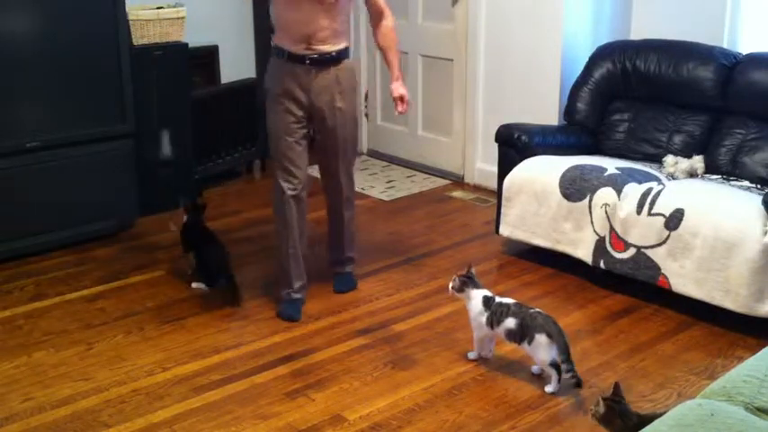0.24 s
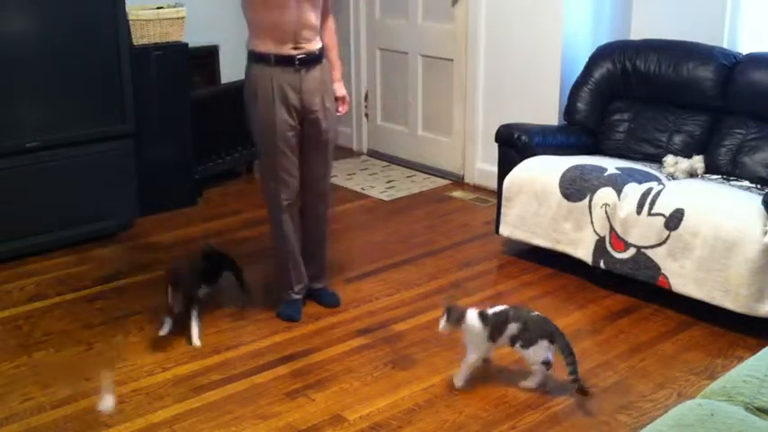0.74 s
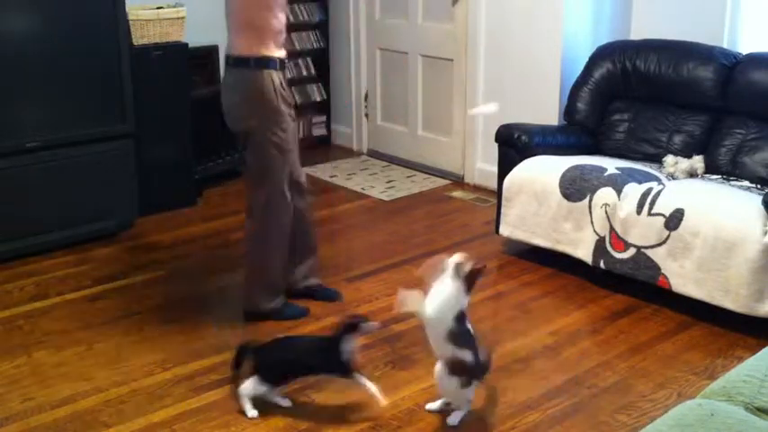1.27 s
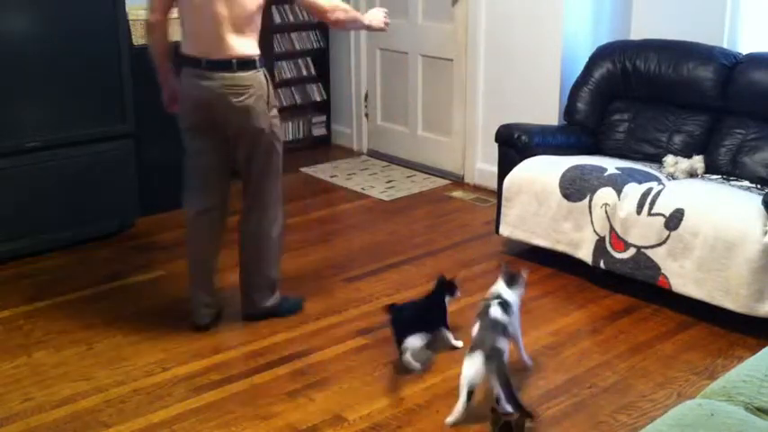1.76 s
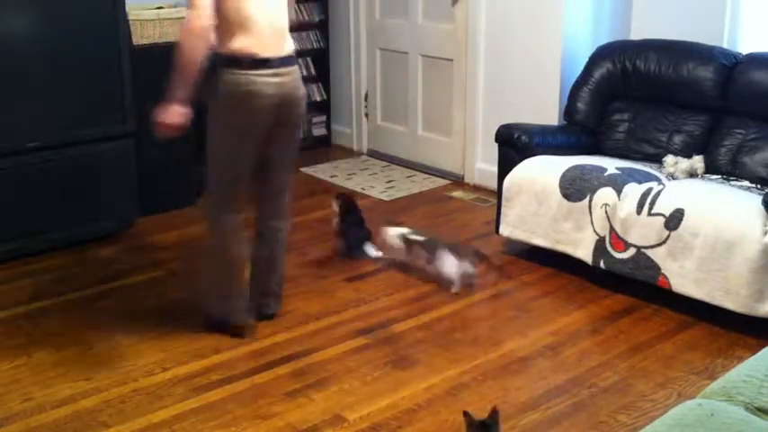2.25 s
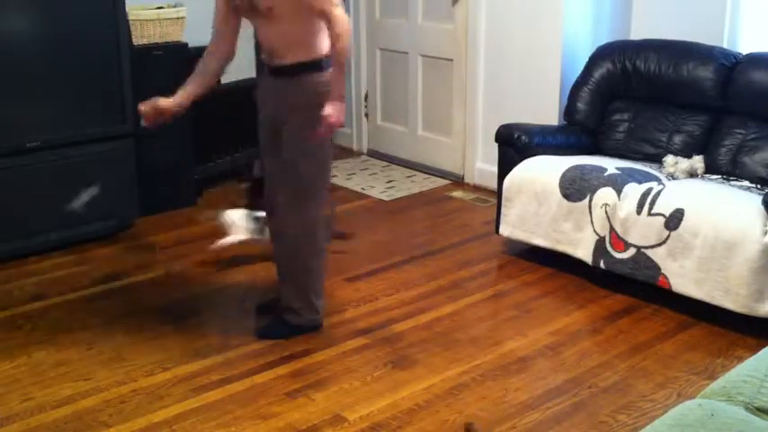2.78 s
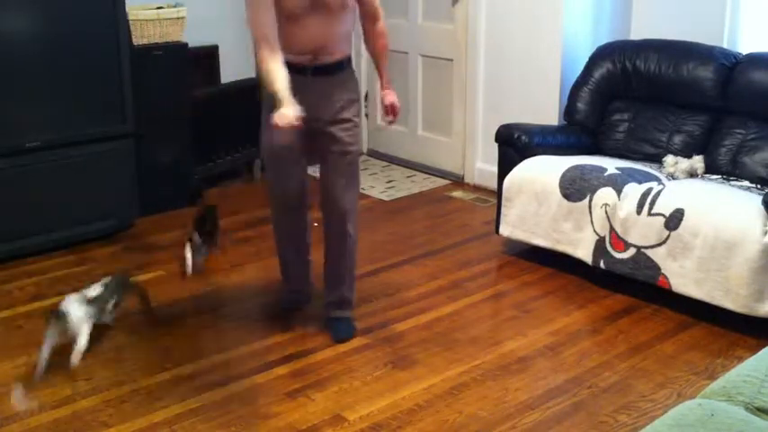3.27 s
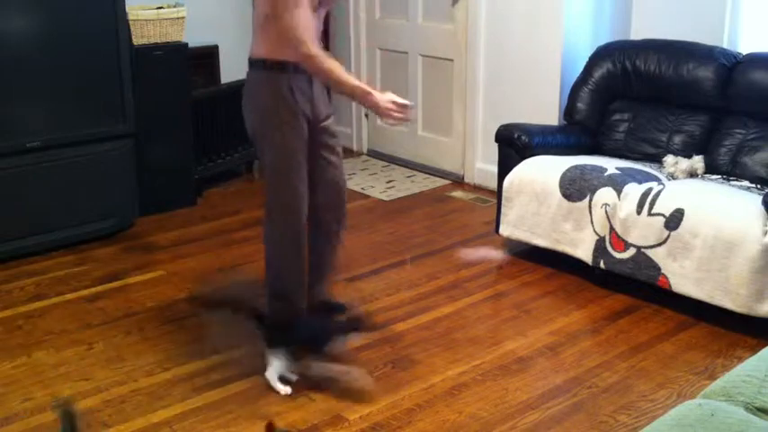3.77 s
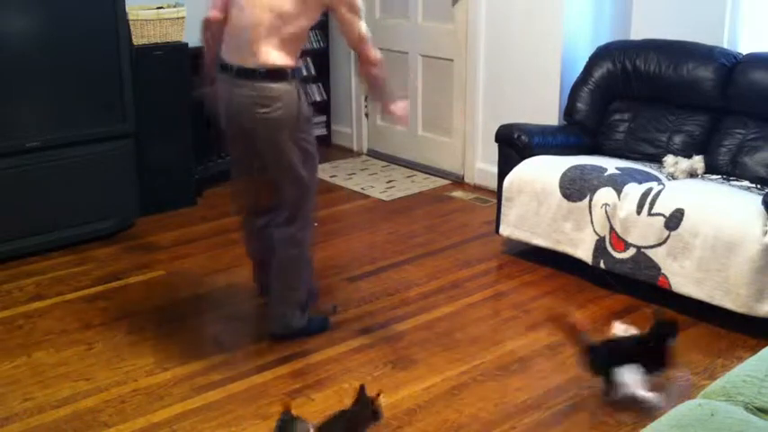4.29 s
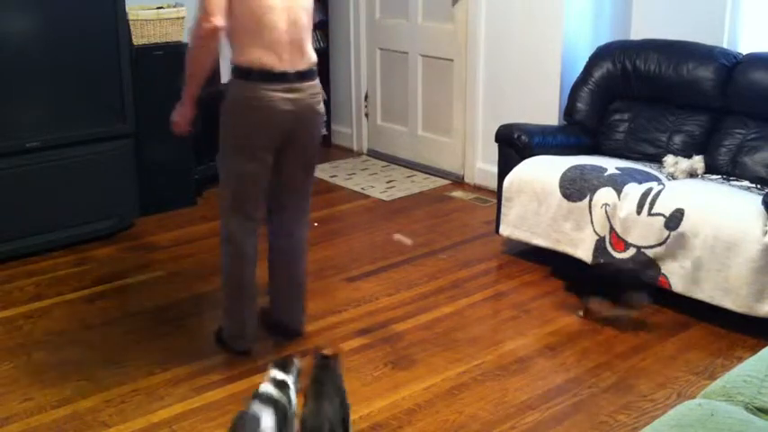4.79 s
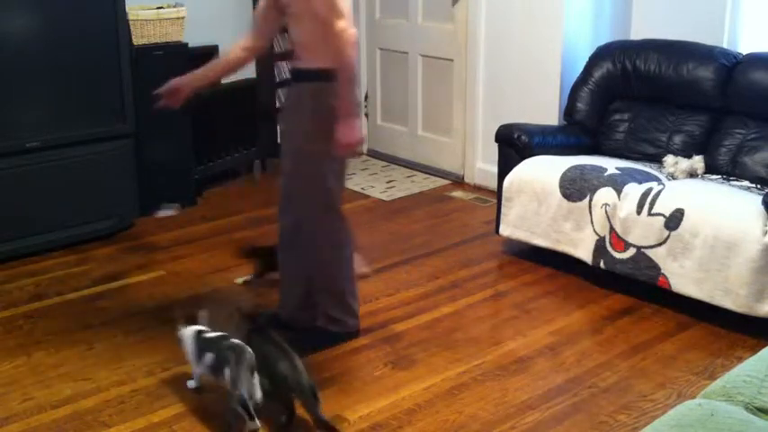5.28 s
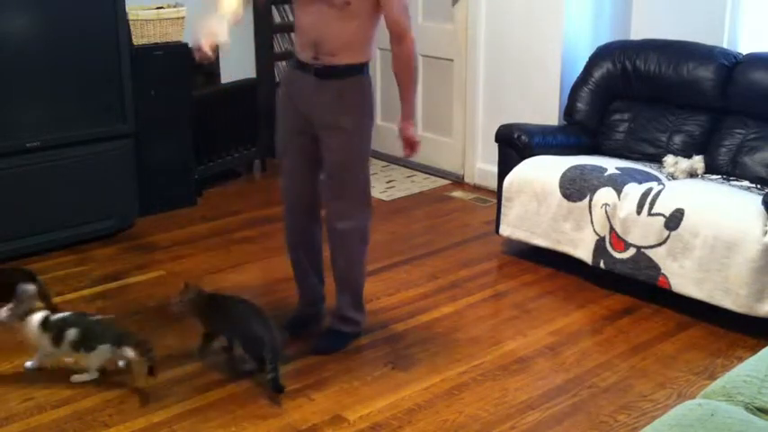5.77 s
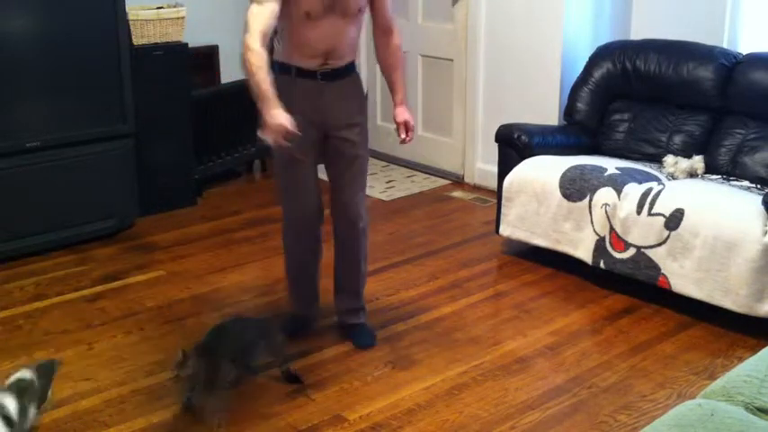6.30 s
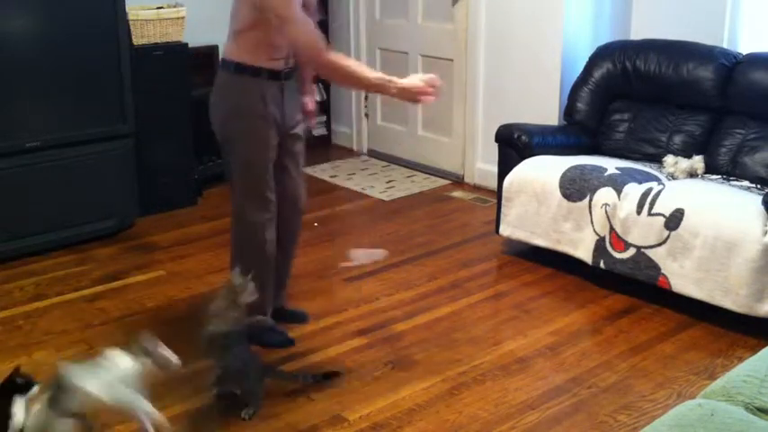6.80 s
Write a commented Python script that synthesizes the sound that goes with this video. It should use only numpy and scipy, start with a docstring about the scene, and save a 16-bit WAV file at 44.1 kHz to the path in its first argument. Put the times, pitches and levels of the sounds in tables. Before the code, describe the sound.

Indoors on hardwood, a light rattling toy knocks the boards in dry, irregular clicks while claws skid and padded paws land with dull thumps. The opening is sparse, with louder double clacks near the middle and the busiest, hardest hits towards the end. Soft gritty rubbing swells and fades. Short room echo, quiet air, one slightly dull small microphone.

```python
"""Cats chasing a toy on bare boards

In a living room cats chase a small hard toy swung on a string over a bare wooden floor.
Toy and claws tap and skid: gritty noise bursts through resonances of board, shell and rattle.
Paws land with soft thumps from low resonances; fur and socks scuff as lumpy, grainy noise.
The room answers every contact with a decaying noise tail; a faint hush of air lies underneath."""
import sys
import numpy as np
from scipy import signal
from scipy.fft import rfft, irfft, next_fast_len
from scipy.io import wavfile
from scipy.ndimage import map_coordinates

SR = 44100
rng = np.random.default_rng(int(sys.argv[2]) if len(sys.argv) > 2 else 0)


def unload_wav(signal):
    """Save mono or channel-first audio to the path in sys.argv[1] as 16-bit WAV at rate SR, clipped to [-1, 1]."""
    wavfile.write(
        sys.argv[1],
        SR,
        np.round(np.clip(np.atleast_2d(signal).T, -1, 1) * 32767).astype(np.int16),
    )


N = 310905  # samples in the scene
LIFE = 2 ** 15  # samples kept for one contact and its room answer

# Response of the small microphone. Each row: frequency in Hz, gain in dB.
MIC = [(30, -17), (120, -7), (300, -3.5), (750, -4.5), (1000, -4), (2500, -4.5), (3200, -12.5),
       (4100, -7.5), (5200, -8.5), (5800, -5.5), (8000, -9), (11000, -5.5), (15000, -11.5)]


def taps():
    """Each tap rings the board, the toy's shell and rattle, cracks in the treble and gives a faint low push."""
    # Hits of toy and claws. Each row: start in seconds, nominal peak in dB ahead of the microphone,
    # board level in dB, pitch of the toy's ring in Hz, shell level in dB, rattle pitch in Hz,
    # rattle level in dB, crack level in dB, skid decay time in seconds, room over direct sound in dB.
    # Board, shell, rattle and crack levels are relative to the ring.
    tap_rows = [(0.026, -43, -10, 2040, -8, 4470, -13, -17, 0.0032, 14),
                (0.056, -37.5, -16, 2180, -12, 4340, 9, -4, 0.0025, 9),
                (0.074, -30, 11.5, 2140, 7, 4280, 25, 6.5, 0.003, 3.5),
                (0.356, -45.5, 4, 1990, -10, 4130, 6, -29, 0.0022, 3),
                (0.387, -27, -16, 1910, -9, 4600, 1, -8.5, 0.0028, 9.5),
                (0.557, -42, -5, 1690, -10, 4200, 12, -8, 0.0025, 10),
                (0.894, -18, -46, 1900, -24, 4820, -11, -19, 0.0023, 3.5),
                (1.033, -31, -1, 2070, 0, 4260, 18, -4, 0.0025, 11),
                (1.062, -37.5, 3, 2190, 0, 4200, 6, -4, 0.0022, 3),
                (1.13, -33, -15, 2370, -7.5, 4450, -8, -10, 0.0021, 7),
                (1.147, -44, -15, 2120, -17, 3970, -3, -15, 0.0025, 7),
                (1.283, -43, -14, 1300, -8, 3760, 10, 1, 0.0033, 11),
                (1.342, -41, 2.5, 2530, 1.5, 4320, -1, -0.5, 0.007, 13),
                (1.773, -37.5, -10, 2310, -13, 3890, -22, -22, 0.0025, 4),
                (1.795, -30, -12.5, 1630, -26, 4550, -6, -13.5, 0.0053, 3),
                (2.023, -15, 0.5, 1460, -11.5, 4000, -5.5, -13, 0.0021, 13.5),
                (2.06, -31.5, 12, 1380, -18, 4700, 10, -9, 0.0023, 9),
                (2.308, -36.5, -18, 2130, -3, 4230, -6, -15, 0.0018, 3),
                (2.344, -24.5, -24, 1350, -4.5, 4200, -6, -10.5, 0.0075, 10),
                (2.452, -30, -2, 1980, -7, 4130, -7, -22, 0.0025, 9),
                (2.518, -30, -25, 1930, -4, 4070, 5, -5.5, 0.0031, 15),
                (2.542, -24, -16, 2150, -15, 4850, -6.5, -13.5, 0.0057, 18),
                (2.827, -32.5, -19, 1460, 7, 4620, 13, -16, 0.0013, 1.5),
                (3.094, -15, -3, 1640, -11, 4000, -8, -4, 0.0013, 9),
                (3.099, -12, -3, 1780, -3.5, 4130, -8, -5.5, 0.0012, 2),
                (3.328, -28, 8, 2400, -17, 4600, -3, 14, 0.0032, 9),
                (3.365, -31.5, 11, 1310, -8, 3780, 3, 0, 0.0069, 17),
                (3.493, -18.5, -5.5, 1730, -21, 3740, -11, -12, 0.00083, 7.5),
                (3.598, -18.5, -15, 2120, -4, 4330, -11, -20, 0.0015, 2),
                (3.743, -23.5, 8, 1250, -21, 5240, -24, 21, 0.0025, 0),
                (3.782, -28.5, 14, 1610, -15, 4370, -16, 8.5, 0.0038, 7),
                (3.913, -32.5, 16.5, 1860, 0, 5400, 12, 9.5, 0.0022, 14),
                (4.029, -39, -7, 1360, -17, 4040, -6, -10, 0.0025, 5),
                (4.202, -34.5, 6, 2210, -14, 5080, -3, 1, 0.0075, 10),
                (4.241, -25, -11.5, 2270, -10, 4000, -1.5, -12, 0.0051, 8),
                (4.267, -25.5, -13, 2190, -17, 4680, -3.5, -16, 0.0054, 7),
                (4.304, -28, -4, 1840, -10, 4200, 9, -4.5, 0.0075, 13),
                (4.466, -15.5, 1.5, 1450, -9.5, 4720, -4.5, -13.5, 0.0015, 12),
                (4.479, -24.5, -17, 1460, -8, 4170, -13, -1, 0.0025, 3.5),
                (4.614, -27, 3.5, 1210, -4, 4280, 1, -5.5, 0.0064, 9),
                (4.709, -33.5, -2, 2160, 0, 4060, 2, -3, 0.0023, 7),
                (4.791, -35, 9.5, 1290, -8, 4280, -1, -5, 0.0035, 17),
                (4.873, -22.5, -15.5, 2320, -13.5, 4900, -19, -20.5, 0.0048, 8.5),
                (5.106, -34, -1, 1740, -4, 4930, -32, -5.5, 0.0031, 17),
                (5.131, -34, 0, 1770, -12, 4390, -19, -8, 0.0025, 3),
                (5.162, -31, -5.5, 1580, -23, 4700, -19, -16.5, 0.0042, 13),
                (5.224, -32, -7, 1590, -19, 4670, -7, -17, 0.0029, 17),
                (5.245, -25.5, 0, 1720, -15, 4600, 8, -6, 0.0047, 18),
                (5.591, -26.5, -5, 2420, -13, 4040, -13, -15, 0.0067, 6.5),
                (5.621, -14, 1, 2450, -11, 4430, 16, -3.5, 0.0025, 5.5),
                (5.627, -18, -3, 2230, -13, 4160, 34, -4, 0.0021, 7),
                (5.65, -14, -18, 1860, 4.5, 4640, 8, 2.5, 0.0016, 20),
                (5.669, -18, -3, 1860, -2, 4150, -9, -14, 0.0019, 0.5),
                (5.937, -36.5, 1, 2080, -6, 5000, -15, 1.5, 0.0029, 10),
                (6.017, -37, -2, 2280, -19, 5040, -19, -12, 0.0033, 6),
                (6.063, -32, -6, 1390, -24, 4120, -23, -1, 0.0021, 14),
                (6.163, -31, -26, 2050, -7, 5160, -35, -11.5, 0.0019, 5.5),
                (6.244, -14.5, 3.5, 2140, -4.5, 4060, 7, -2, 0.0039, 8.5),
                (6.277, -17, 8.5, 2080, -6, 4900, 14, -8, 0.0018, 6),
                (6.52, -30.5, 0, 2060, -7.5, 4450, 0, -6.5, 0.0044, 12),
                (6.581, -41, 6, 2020, -16, 4570, -6, 13, 0.0025, 5),
                (6.707, -13.5, 8.5, 1420, 6.5, 4420, -4, -7, 0.00092, 3)]
    # Weaker rings of the toy's shell. Each row: pitch in Hz, width in Hz, level in dB added to the tap's shell level.
    shell_rings = [(1566, 167, -12), (1897, 1800, 4.5), (2790, 2100, -14.5)]
    columns = np.array(tap_rows).T[:, :, None]
    s, db, board_db, ring_hz, shell_db, rattle_hz, rattle_db, crack_db, skid, room_db = columns
    f = np.fft.rfftfreq(LIFE, 1 / SR)

    board = amp(board_db) * mode(f, hz=1058, width_hz=566) ** 2
    # a hit that wakes more shell rings broader: 0.14 dB of width per dB of shell
    width_over_pitch = np.clip(0.4 * amp(0.14 * shell_db), 0.1, 1)
    ring = mode(f, ring_hz, width_over_pitch * ring_hz) ** 2
    shell = sum(amp(shell_db + level) * mode(f, hz, width) ** 2 for hz, width, level in shell_rings)
    # a freer, louder rattle rings purer: 0.19 dB of width lost per dB of level
    rattle_width_hz = 1190 * amp(-0.19 * rattle_db)
    rattle = amp(rattle_db) * mode(f, rattle_hz, rattle_width_hz) ** 2
    crack = amp(crack_db) * mode(f, hz=6350, width_hz=24200) ** 2

    body = board - ring - shell + rattle + crack
    floor = spots(count=len(s), spread=0.006, depth=0.44)
    sound = body * floor * contacts(skid, wet_db=room_db, build=0.00061, grit_db=-3.0)
    # the joists give once with the board, without echo
    push = amp(-4.5 + 0.27 * board_db) * mode(f, hz=24, width_hz=63)
    return played(s[:, 0], db[:, 0], sound + push, crest_db=8.5)


def paws():
    """A padded paw pushes the boards softly: a boom that depends on the spot and a duller thud above it."""
    # Landings. Each row: start in seconds, nominal peak in dB ahead of the microphone, boom pitch in Hz,
    # thud level in dB relative to the boom, contact decay time in seconds, room over direct sound in dB.
    landings = [(0.12, -56.5, 370, -15, 0.0072, 4), (0.239, -58, 400, -10, 0.006, 1),
                (0.689, -55, 354, -22, 0.0047, 5), (0.889, -45, 257, -17, 0.006, 0),
                (0.91, -36, 229, -22, 0.0067, 5), (1.145, -39.5, 186, -9, 0.0091, 6),
                (1.462, -42.5, 240, -16, 0.0067, 3), (1.647, -55, 214, -20, 0.006, 3),
                (1.918, -46, 197, -17, 0.0075, 4), (2.023, -39.5, 315, -14, 0.0051, 0),
                (2.076, -33.5, 272, -22, 0.003, 12), (2.309, -40, 344, -7, 0.0079, 0),
                (2.343, -31.5, 200, 5, 0.006, 9), (2.453, -45, 172, 2, 0.0055, 6),
                (2.809, -34.5, 334, -23, 0.005, 1.5), (2.83, -32, 213, -22, 0.0045, -3.5),
                (3.096, -42, 306, -8, 0.006, 5), (3.232, -32.5, 272, -29, 0.0053, -2.5),
                (3.326, -34.5, 244, -14, 0.006, -0.5), (3.474, -40, 226, -6, 0.006, 1),
                (3.646, -30.5, 220, -2, 0.006, 1), (3.742, -34, 210, -9, 0.011, 8),
                (4.024, -35.5, 244, -22, 0.0056, -1.5), (4.292, -35.5, 247, -14, 0.0046, 1),
                (4.386, -45, 210, -13, 0.006, -1), (4.474, -33.5, 331, 8, 0.0054, 9),
                (4.492, -33.5, 268, -2, 0.006, -8), (4.68, -40.5, 249, -16, 0.006, 3),
                (4.952, -45.5, 180, -28, 0.015, 9), (5.146, -51.5, 410, -13, 0.0065, 3),
                (5.348, -42.5, 205, -22, 0.006, 3), (5.552, -34.5, 242, -28, 0.0049, 1),
                (5.658, -37, 304, -19, 0.0052, -3), (5.708, -26.5, 320, -26, 0.0037, 2.5),
                (5.907, -34, 272, -5, 0.0068, 4.5), (6.202, -49, 210, -8, 0.006, 1),
                (6.249, -31, 392, -11, 0.0071, 6.5), (6.416, -36.5, 310, -13, 0.0079, 3),
                (6.543, -36.5, 244, -14, 0.0054, -1), (6.602, -33.5, 347, -28, 0.006, 2),
                (6.702, -37.5, 392, 1, 0.0075, 3), (6.976, -33, 174, -28, 0.0068, 7)]
    s, db, boom_hz, thud_db, contact, room_db = np.array(landings).T[:, :, None]
    f = np.fft.rfftfreq(LIFE, 1 / SR)
    boom = mode(f, boom_hz, width_hz=0.42 * boom_hz) ** 2
    thud = amp(thud_db) * mode(f, hz=547, width_hz=126) ** 2
    boards = amp(-4.5) * mode(f, hz=229, width_hz=196) ** 2
    body = boom - thud + boards
    floor = spots(count=len(s), spread=0.0056, depth=0.77)
    sound = body * floor * contacts(contact, wet_db=room_db, build=0.0015, grit_db=1.5)
    return played(s[:, 0], db[:, 0], sound, crest_db=5.5)


def scuff():
    """Soft gritty rubbing of fur and socks on the boards, which comes in lumps and rings on in the room."""
    # Rubbing over time. Each row: time in seconds, level in dB ahead of lumps, room and microphone.
    rub_levels = [(0.0, -61), (0.14, -49), (0.39, -66), (0.7, -61.5), (0.94, -75), (1.06, -53),
                  (1.55, -63.5), (1.77, -60.5), (2.26, -49.5), (2.51, -44.5), (2.61, -50), (2.75, -47.5),
                  (2.9, -57.5), (3.14, -68), (3.26, -53.5), (3.65, -42.5), (4.02, -50), (4.26, -53.5),
                  (4.46, -41), (5.2, -57), (5.38, -62.5), (5.61, -56.5), (5.77, -39), (6.05, -56.5),
                  (6.42, -50.5), (7.05, -56)]
    # Colour of fur and socks on wood. Each row: frequency in Hz, relative spectral level in dB per Hz.
    fur_colour = [(150, -7), (400, 2), (750, -3), (1500, -6), (3000, -3), (4500, -0.5), (8000, -10),
                  (12000, -19), (16000, -9.5)]
    grains = rng.standard_normal(N) * amp(4.7 * rng.standard_normal(N))  # uneven grit
    rubbing = unit(filtered(grains, lambda hz: amp(along(fur_colour, hz))))
    lumps = amp(3 * wobble(30))
    times, db = np.transpose(rub_levels)
    level = amp(np.interp(np.arange(N) / SR, times, db))
    # one very short contact with its answer serves as the room's echo
    echo_spectrum = contacts(np.array([[0.0005]]), wet_db=-9.0, build=0.0051, grit_db=-14)
    room = irfft(echo_spectrum, LIFE)[0]
    close_sound = rubbing * lumps * level
    return signal.fftconvolve(close_sound, room / np.linalg.norm(room))[:N]


def air():
    """The faint hush of the house: coloured noise whose level wavers a little."""
    # Colour of the hush as heard through the microphone.
    # Each row: frequency in Hz, relative spectral level in dB per Hz.
    hush_colour = [(41, -16.5), (70, -10.5), (118, 4.5), (268, 3), (394, -8.5), (695, -7.5), (892, -24),
                   (977, -22), (1070, -12.5), (1930, -17.5), (3570, -19), (4800, -21.5), (14900, -22.5),
                   (16000, -13)]
    # the microphone's colour is taken out here because record() adds it
    colour = lambda hz: amp(along(hush_colour, hz) - along(MIC, hz))
    hush = unit(filtered(rng.standard_normal(N), colour))
    level_db = -53 + 0.23 * wobble(12.0)  # ahead of the microphone
    return amp(level_db) * hush


def contacts(length, wet_db, build, grit_db):
    """Spectra of gritty direct sounds, each with a fresh room answer that swells while its contact lasts."""
    # Reverberation of the living room. Each row: frequency in Hz, time to fall 60 dB in seconds.
    room_decay = [(150, 0.64), (500, 0.37), (1400, 0.44), (4000, 0.43), (10000, 0.39), (16000, 0.27)]
    n = LIFE * 3 // 4
    length, age = np.clip(length, 1e-4, 0.06), np.arange(n) / SR  # seconds
    # noise that dies away at its own pace in each band
    hz, t, z = signal.stft(rng.standard_normal((len(length), n)), SR, nperseg=256)
    decay = amp(-60 * t / along(room_decay, hz)[:, None])
    tail = signal.istft(z * decay, SR, nperseg=256)[1][:, :n]
    # single walls stand out at first
    walls = amp(5.98 * np.exp(-age / 0.015) * rng.standard_normal(tail.shape))
    swell = 1 - np.exp(-age / (build + length))
    tail = tail * walls * swell
    grit = amp(grit_db * rng.standard_normal(tail.shape))
    direct = rng.standard_normal(tail.shape) * grit * np.exp(-age / length)
    norm = lambda x: np.linalg.norm(x, axis=1, keepdims=True)
    return rfft(direct / norm(direct) + amp(wet_db) * tail / norm(tail), LIFE)


def spots(count, spread, depth):
    """Each spot on the floor adds its own cluster of very close reflections, which ripples the colour."""
    t = np.arange(SR // 50) / SR
    near = rng.standard_normal((count, len(t))) * np.exp(-t / spread)
    near = near / np.linalg.norm(near, axis=1, keepdims=True)
    return 1 + depth * rfft(near, LIFE)


def mode(f, hz, width_hz):
    """A causal resonance of peak gain 1."""
    return 1j * f * width_hz / (hz * hz - f * f + 1j * f * width_hz + 1e-9)


def played(times, db, spectra, crest_db):
    """Place each contact at its moment, the RMS of its first 40 ms crest_db below its nominal peak."""
    out = np.zeros(N + LIFE)
    for s, level, sound in zip(times, db, irfft(spectra, LIFE)):
        head_rms = np.sqrt(np.mean(sound[:SR // 25] ** 2))
        out[round(s * SR):][:LIFE] += amp(level - crest_db) * sound / head_rms
    return out[:N]


def amp(db):
    """Amplitude factor of a level in dB."""
    return 10 ** (np.asarray(db) / 20)


def unit(x):
    """Scale x to an RMS of 1."""
    return x / np.sqrt(np.mean(x ** 2) + 1e-20)


def along(points, hz):
    """Read a curve of (Hz, value) points on a log frequency axis."""
    f, v = np.transpose(points)
    return np.interp(np.log(hz + 1), np.log(f + 1), v)


def wobble(rate):
    """A smooth random curve with rate knots a second."""
    knots = rng.standard_normal(int(N * rate / SR) + 4)
    return map_coordinates(knots, [np.arange(N) * rate / SR])


def filtered(x, response):
    """Shape the spectrum of x by a response given as a function of frequency in Hz."""
    m = next_fast_len(N + SR // 2)
    return irfft(rfft(x, m) * response(np.fft.rfftfreq(m, 1 / SR)), m)[..., :N]


def scene():
    """Taps, paws and scuffing over the hush of the house, on one channel."""
    return (taps() + paws() + scuff() + air())[None]


def record(dry):
    """A small microphone colours the sound and keeps nothing above its band limit."""
    top_hz = 15900
    return filtered(dry, lambda hz: amp(along(MIC, hz)) * (hz < top_hz))


dry = scene()
out = record(dry)
unload_wav(out)
```